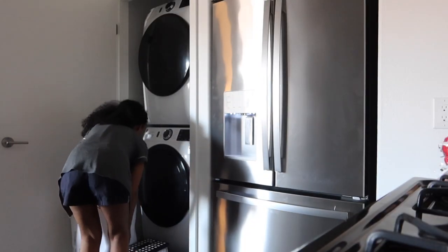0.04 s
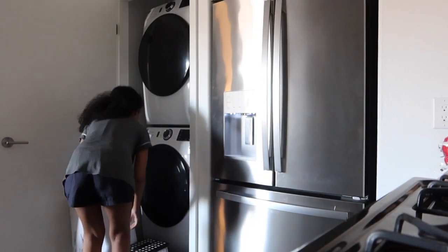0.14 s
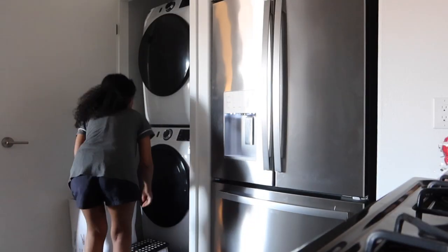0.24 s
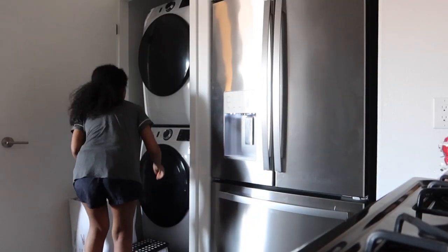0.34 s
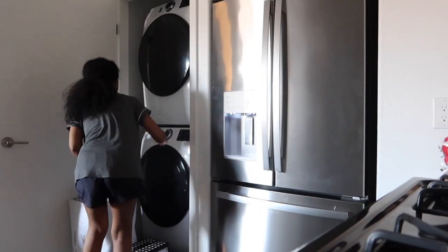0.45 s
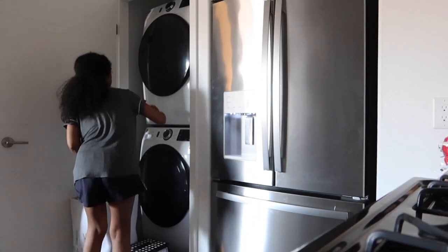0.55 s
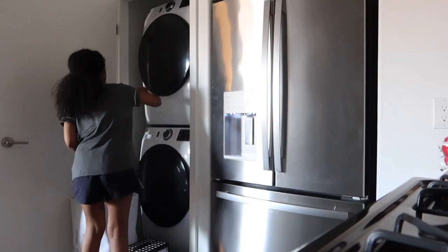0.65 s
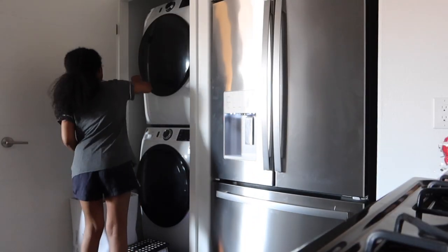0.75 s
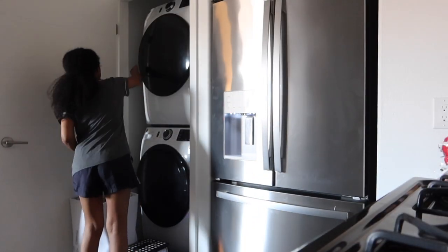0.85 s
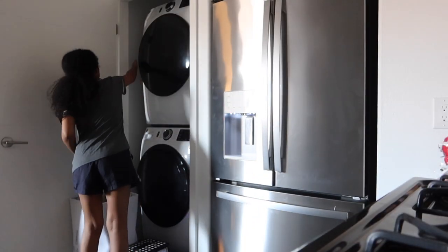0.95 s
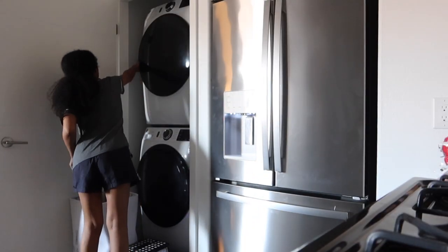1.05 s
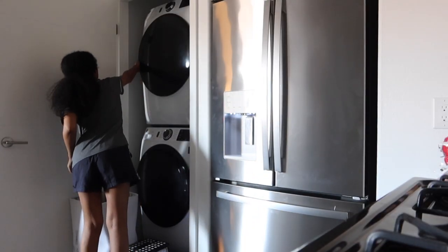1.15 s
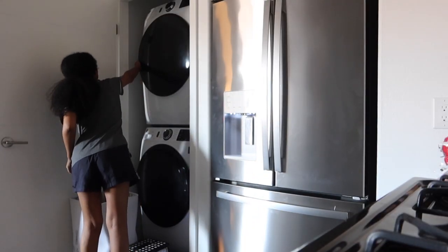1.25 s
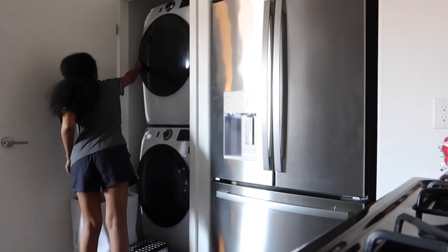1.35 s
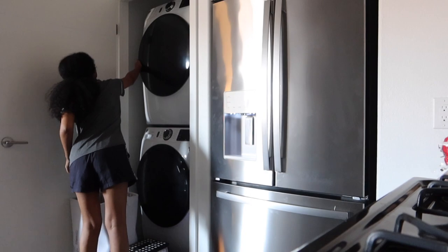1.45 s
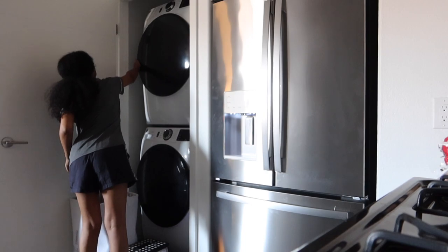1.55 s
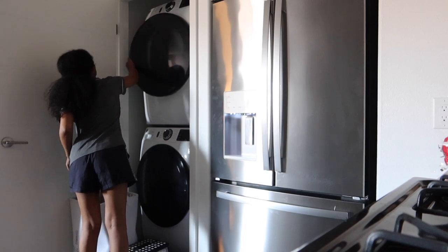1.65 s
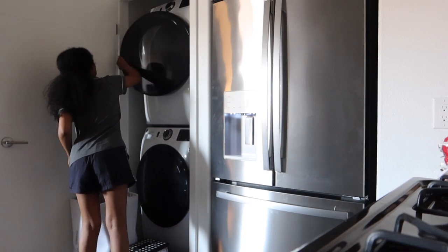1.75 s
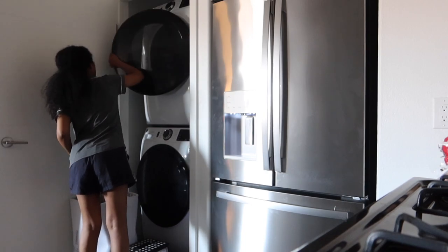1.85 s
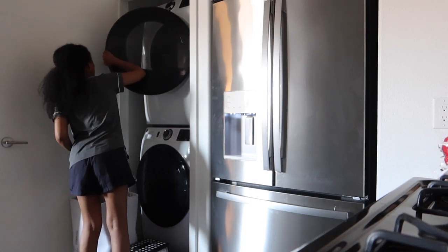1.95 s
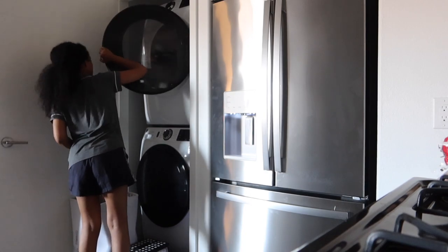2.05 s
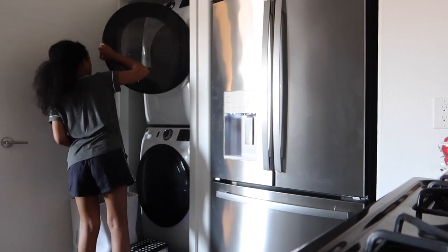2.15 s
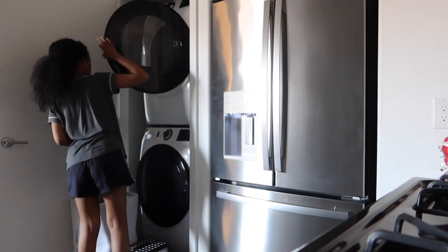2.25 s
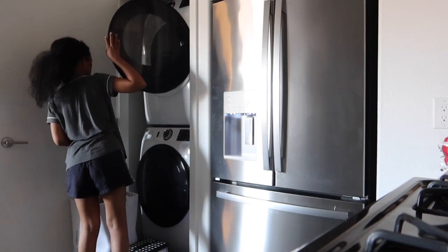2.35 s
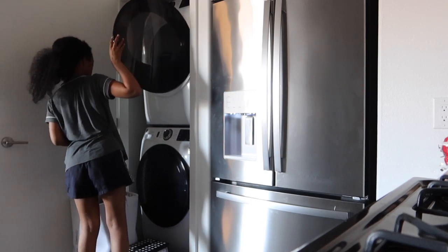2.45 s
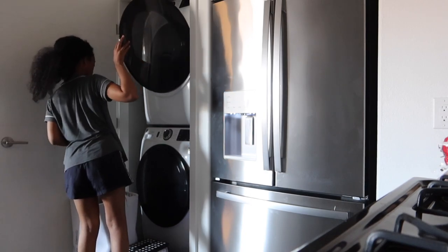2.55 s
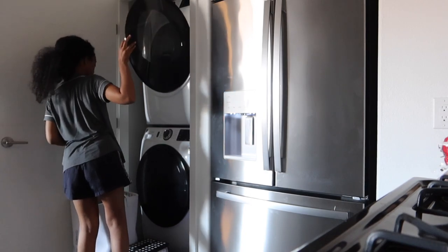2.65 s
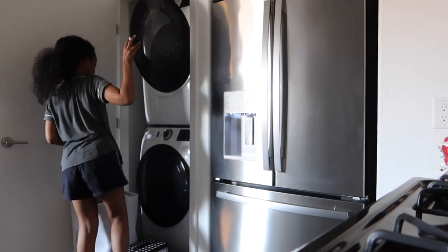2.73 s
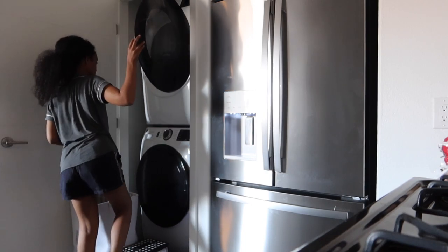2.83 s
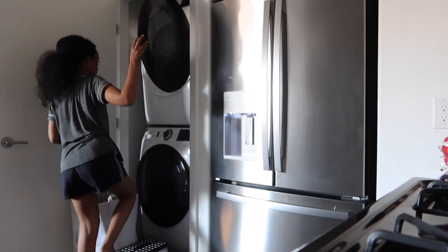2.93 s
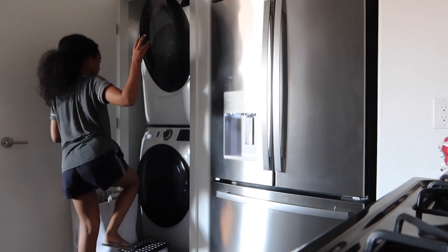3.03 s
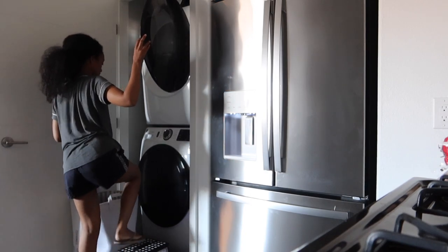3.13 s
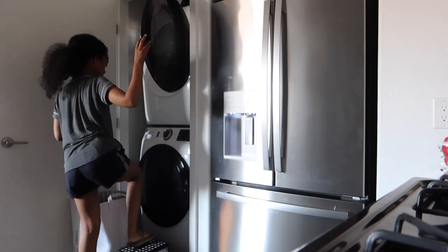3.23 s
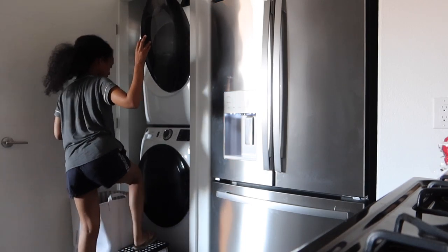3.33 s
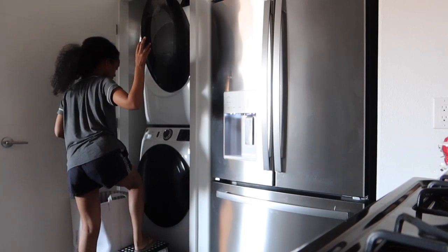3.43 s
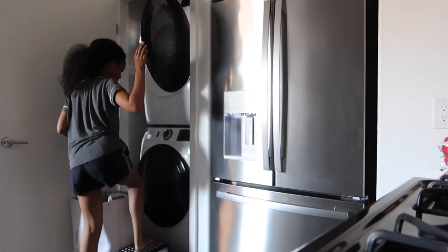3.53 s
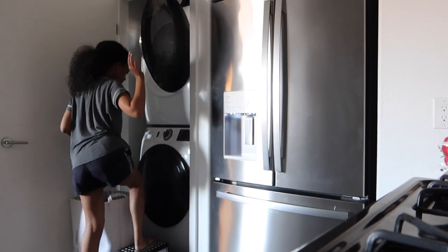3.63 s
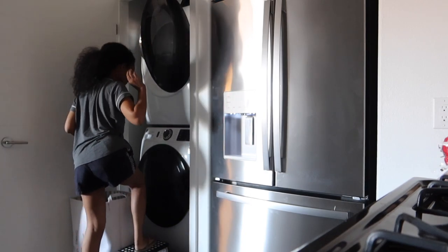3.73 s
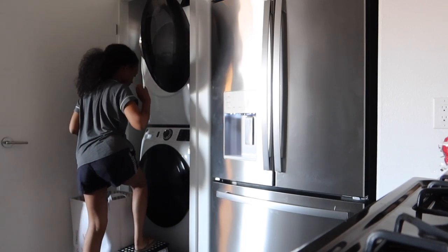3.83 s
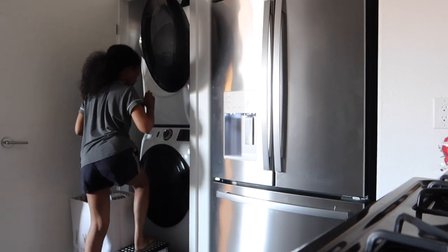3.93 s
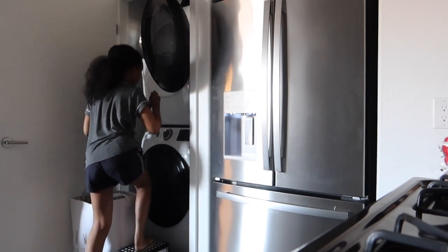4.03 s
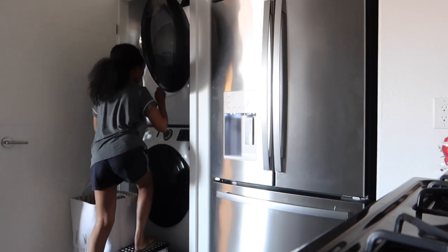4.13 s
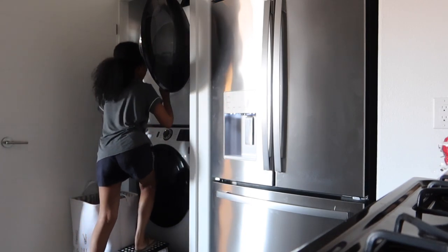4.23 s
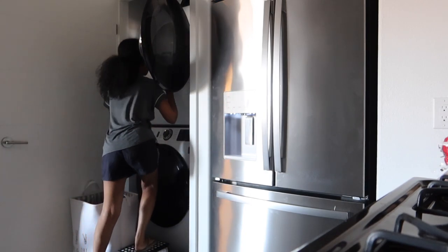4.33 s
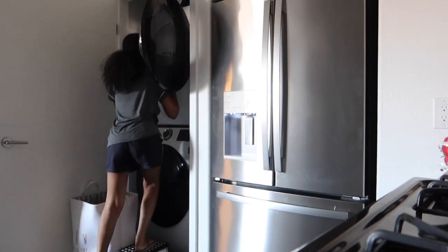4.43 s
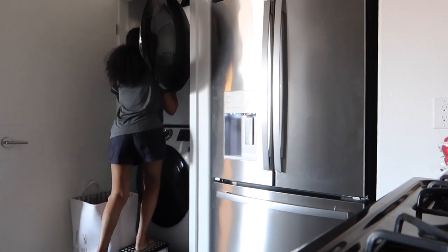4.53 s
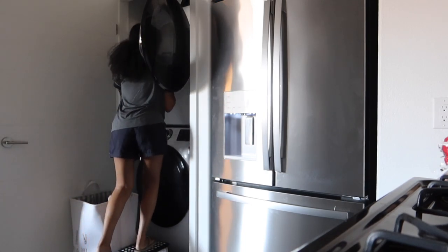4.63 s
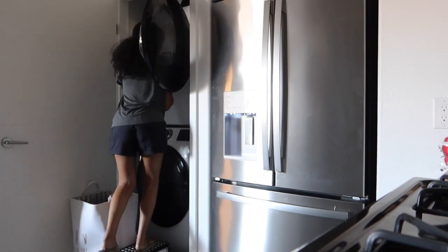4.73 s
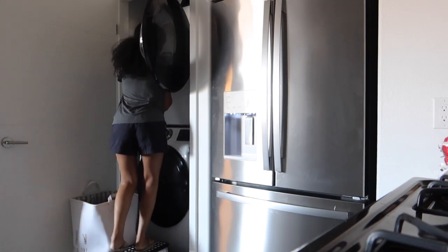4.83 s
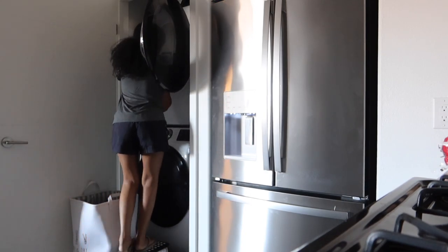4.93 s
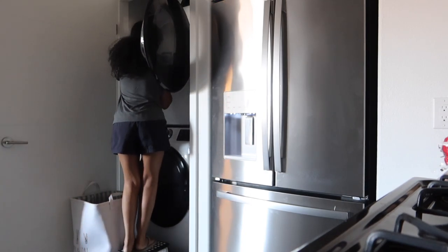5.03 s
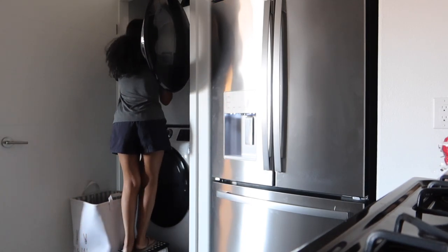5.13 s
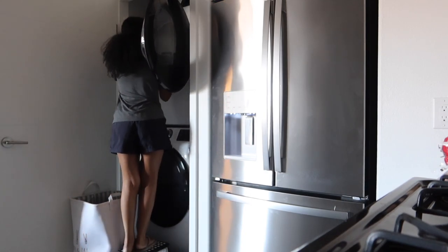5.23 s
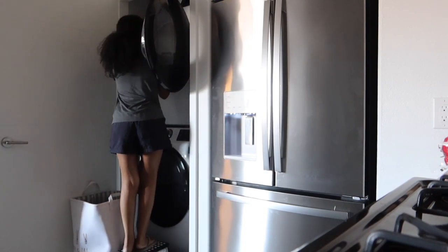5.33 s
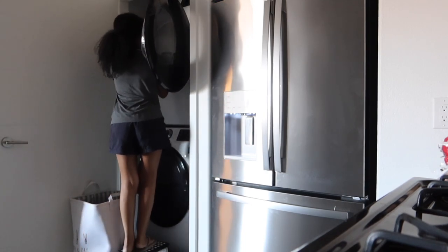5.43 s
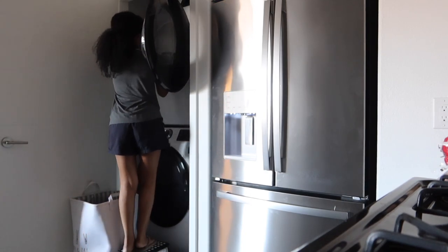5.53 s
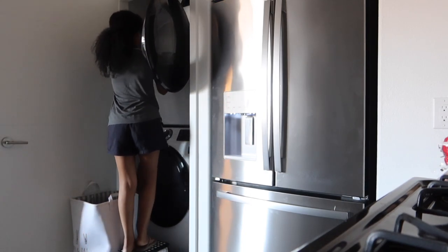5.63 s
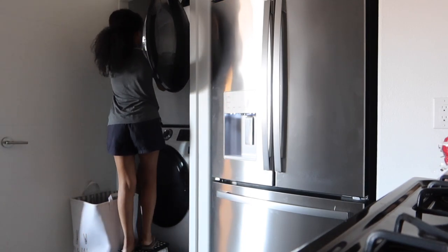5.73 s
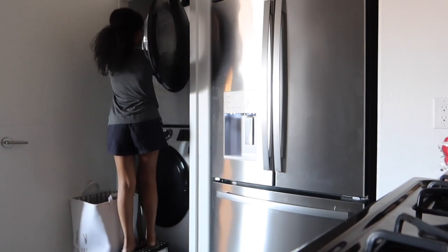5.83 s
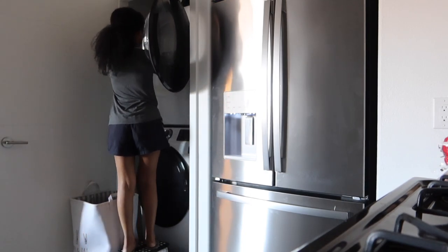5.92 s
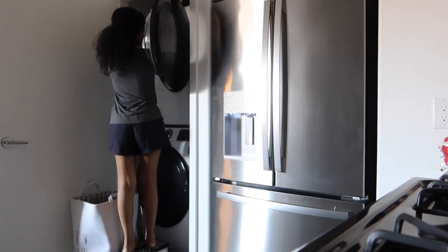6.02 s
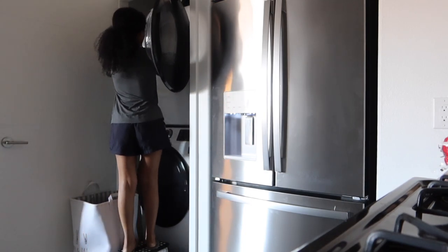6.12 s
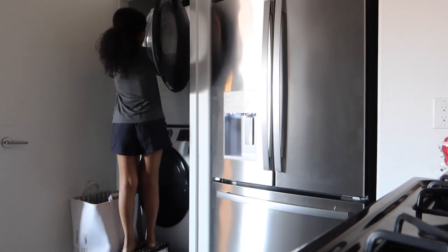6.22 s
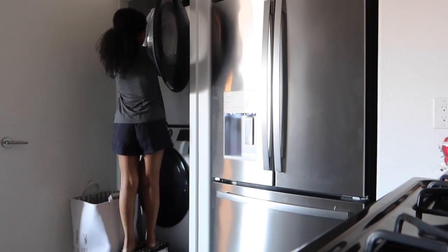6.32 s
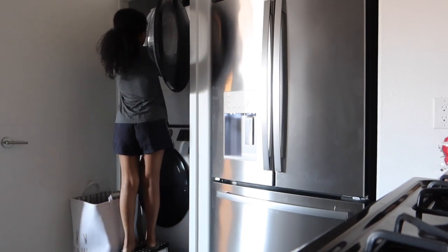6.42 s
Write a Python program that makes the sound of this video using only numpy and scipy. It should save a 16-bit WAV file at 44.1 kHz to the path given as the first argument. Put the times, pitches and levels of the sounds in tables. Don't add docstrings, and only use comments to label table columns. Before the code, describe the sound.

A bare, echoing home with steady low duct rumble, faint hiss and a fridge hum near 93 hertz that swells and fades irregularly. From 0 to 0.3 s cloth rustles and fades; at 0.45-0.65 s a washer door thumps shut, hollow and low, with a latch click and small rebounds, then a light tick at 0.8 s. Fabric rises until a small clack at 1.15 s. From 1.4 s the dryer door strains in quick knocks, popping loudly at 1.6 s with plastic and sheet-metal rattle, trailing taps until 1.95 s. Soft rubbing follows from 2.3 to 3.3 s. At 3.46 s a step stool scrapes and thuds, landing with a hard, ringing clack at 3.66 s. Light foot touches from 4.4 s lead to heavier knocks at 5.0-5.1 s. Cloth rustles faintly, with tiny ticks at 5.7 and 5.9 s, then echo and hum.

```python
import sys
import numpy as np
from scipy import signal
from scipy.io import wavfile
from scipy.ndimage import uniform_filter1d

SR = 44100
rng = np.random.default_rng(int(sys.argv[2]) if len(sys.argv) > 2 else 0)


def invert_db(level):
    return 10 ** (np.asarray(level, dtype=float) / 20)


def to_wav(sig):
    pcm = np.clip(np.atleast_2d(sig), -1, 1) * 32767
    pcm = np.round(pcm).astype(np.int16)
    wavfile.write(sys.argv[1], SR, pcm.T)


N = 285439

# f/Hz, level/dB
NOOK = [(200, -1.5), (800, -5.5), (2500, -1), (5000, -4), (8000, 0.5), (12000, 6)]
# f/Hz, side minus mid/dB
ROOM_SIDE = [(60, -53), (110, -46.5), (200, -35.5), (380, -25), (700, -29), (1290, -24.5), (2380, -25.5),
             (4400, -5), (8120, -1), (15000, 4)]


def unit(x):
    return x / np.sqrt(np.sum(x ** 2) + 1e-30)


def read(points, hz):
    f, value = np.transpose(points)
    return np.interp(np.log(hz + 1), np.log(f + 1), value)


def colour(x, points):
    hz = abs(np.fft.fftfreq(4096, 1 / SR))
    log_gain = np.log(invert_db(np.maximum(read(points, hz), -100)))
    taps = np.fft.ifft(np.exp(np.conj(signal.hilbert(log_gain)))).real[:2048]
    taps = taps[None] * np.ones(x.shape[:-1] + (1,))
    return signal.oaconvolve(x, taps, axes=-1)[..., :x.shape[-1]]


def hiss(points, patchy_db, size=2048):
    # f/Hz, side minus mid/dB
    noise_side = [(60, -33), (110, -25.5), (200, -10), (380, -13), (700, -10.5), (1290, -8.5), (2380, -6.5),
                  (4400, -4), (8120, -4), (15000, -2)]
    hz = np.fft.rfftfreq(size, 1 / SR)
    a, b, c, d, patches = rng.standard_normal((4 * N // size + 5, len(hz), 5)).T
    patches = uniform_filter1d(patches, size // 80, 0)
    patches = uniform_filter1d(patches, 16384 // size, 1)
    side_gain = invert_db(read(noise_side, hz))[:, None]
    spectra = np.array([a + 1j * b, (c + 1j * d) * side_gain])
    spectra *= invert_db(read(points, hz)[:, None] + patchy_db * patches / patches.std())
    x = signal.istft(spectra, nperseg=size, noverlap=3 * size // 4)[1][:, :N]
    return x / x[0].std()


def ducts():
    # f/Hz, level/dB per Hz
    duct_colour = [(15, -42), (27, -11), (59, -15.5), (96, -5), (193, -12.5), (227, -20), (281, -13),
                   (440, -11.5), (520, -23), (871, -22.5), (1080, -27.5), (1530, -31.5), (3340, -38),
                   (15500, -61)]
    return invert_db(-40) * hiss(duct_colour, patchy_db=1.5, size=4096)


def fridge_hum():
    # t/s, level/dB
    swell = [(0.0, -61), (0.35, -36), (0.7, -55), (0.95, -42), (1.4, -43), (1.95, -53), (2.2, -38.5),
             (2.7, -38), (3.05, -64), (3.7, -44), (4.3, -48), (4.7, -40.5), (5.05, -37.5), (5.35, -56),
             (5.6, -39.5), (5.9, -63), (6.2, -37), (6.47, -51)]
    pitch_hz, waver_hz, throb_db, waver_s = 92.6, 4.02, 1.5, 0.0615
    span = round(waver_s * SR)
    drift = uniform_filter1d(rng.standard_normal((2, N)), span)
    waver, throb = uniform_filter1d(drift, span)
    hz = pitch_hz + waver_hz * waver / waver.std()
    db = np.interp(np.arange(N) / SR, *np.transpose(swell)) + throb_db * throb / throb.std()
    hum = np.sqrt(2) * invert_db(db - 5.0) * np.sin(2 * np.pi * np.cumsum(hz) / SR)
    return hum * [[1], [0]]


def cloth():
    # t/s, length/s, level at start/dB, level at end/dB
    rustles = [
        (0.0, 0.33, -46, -60),
        (0.708, 0.43, -61, -47),
        (2.294, .45, -54.5, -56),
        (2.737, 0.54, -51, -54.5),
        (4.098, 0.94, -55.5, -64),
        (5.4, 1.5, -55, -59),
    ]
    # f/Hz, level/dB per Hz
    cloth_colour = [(200, -39), (600, 18.5), (1500, 10), (3000, 0), (6000, -8.5), (12000, -22),
                    (15500, -35)]
    level = np.zeros(N)
    for s, length, from_db, to_db in rustles:
        part = level[round(s * SR):round((s + length) * SR)]
        part += invert_db(np.linspace(from_db, to_db, len(part))) * signal.windows.tukey(len(part), 0.15)
    return level * hiss(cloth_colour, patchy_db=2.2, size=512)


def strikes(source, blows):
    answers = {"washer": (-0.8, 0.2, -10.5, -22.5, 1.18), "dryer": (0.5, .1, -17.5, -27.5, 1.06),
               "drags": (1, 0.4, -20.5, -31, 1.04), "steps": (3.1, 0.44, -12, -24.5, 1.07)}
    nearness = {"washer": -4, "dryer": 0.7, "drags": -2, "steps": 3.5}
    panel_db, share, latch_db, tick_db, pitch = answers[source]
    for s, force, heft, snap in blows:
        panel = force + panel_db + share * heft
        latch, tick = force + latch_db + snap, force + tick_db + snap
        yield s, nearness[source], pitch, force, force + heft, panel, latch, tick


def washer_door():
    # t/s, force/dB, heft/dB, snap/dB
    shut = [
        (0.3084, -48, -14, 5),
        (0.4651, -41.5, 15, 0),
        (0.4768, -38, 8, -14),
        (0.487, -30.5, -2, 1.5),
        (0.498, -35, 4, 2),
        (0.5139, -30.5, -16, 2),
        (0.5991, -40, -13, -2),
        (0.6491, -42, 0, 6),
        (0.7953, -42.5, -5, 2),
    ]
    return strikes("washer", shut)


def dryer_door():
    # t/s, force/dB, heft/dB, snap/dB
    pull = [(1.155, -32, -9, 2), (1.4169, -38, 5, 4), (1.4466, -35.5, -4, -6), (1.474, -31.5, 3, 0),
            (1.4988, -26.5, -6, 3.5), (1.5277, -27.5, 3, -1), (1.5656, -19.5, -24, 0.5),
            (1.5968, -18.5, -2.5, 6), (1.6055, -13.5, -12.5, 0.5), (1.6267, -23, 6.5, -5),
            (1.6497, -18.5, -6.5, 4.5), (1.7174, -32, 0.5, -9), (1.8638, -32, 3, -2), (1.9315, -34, -4, 0),
            (2.7588, -46.5, -8, -6)]
    return strikes("dryer", pull)


def stool_drags():
    # t/s, force/dB, heft/dB, snap/dB
    drags = [
        (3.458, -28.5, -2, -2),
        (3.4764, -31, 6.5, 6.5),
        (3.5214, -46, 10, -2),
        (3.657, -23.5, -15.5, 0),
        (3.6895, -32, 0, -7),
        (3.712, -32.5, -4, -10),
    ]
    return strikes("drags", drags)


def stool_steps():
    # t/s, force/dB, heft/dB, snap/dB
    feet = [
        (4.4248, -40, -24, 1),
        (4.521, -47, -7, -2),
        (4.7673, -41.5, -3, -14),
        (4.9092, -50.5, 15, 2),
        (5.011, -36, 12, -2),
        (5.0299, -35, -23, 2),
        (5.0707, -28.5, -13, -1),
        (5.7144, -49, -14, 5),
        (5.889, -51.5, 1, 8),
    ]
    return strikes("steps", feet)


def blow(pitch, shell_db, drum_db, panel_db, latch_db, tick_db):
    # f/Hz, level/dB per Hz
    shell = [(900, -9), (1500, 7), (2000, 3.5), (2800, -1), (3500, -8), (4200, -19.5), (8000, -54)]
    drum = [(120, -5), (220, -3.5), (340, 0.5), (470, -8), (700, -3), (1500, -76.5)]
    panels = [(350, -62), (600, 8.5), (850, 5.5), (1300, 6.5), (1900, -18), (4000, -46)]
    latch = [(2200, -26.5), (3200, -8), (4300, -1.5), (6000, -6.5), (7500, -17), (11000, -36)]
    tick = [(5000, -20), (7500, 5.5), (9500, 0), (11500, -5), (13000, -7), (14200, -16), (15500, -22)]
    rattle_s, rattle_share = 0.004, 0.56
    t = np.arange(4096) / SR
    grains = (rng.random(4096) < 0.15) * rng.standard_normal(4096)
    spray = unit(grains * t * np.exp(-2 * t / rattle_s))
    push = np.arange(4096) == 30
    impacts = np.array([spray, unit(push + rattle_share * spray)])
    hz = np.linspace(0, SR / 2, 513)
    levels = (shell_db, drum_db, panel_db, latch_db, tick_db)
    parts = (np.multiply(shell, [pitch, 1]), drum, panels, latch, tick)
    power = 0
    for db, part in zip(levels, parts):
        power = power + (invert_db(db + 50) * unit(invert_db(read(part, hz)))) ** 2
    blow_gain = invert_db(-0.5)
    return blow_gain * colour(impacts, np.transpose([hz, 10 * np.log10(power)]))


def mode(hz, width_hz, t):
    return np.sin(2 * np.pi * hz * t) * np.exp(-np.pi * width_hz * t)


def echoes():
    # f/Hz, t60/s
    room_t60 = [(60, 1.3), (150, 0.91), (400, 0.91), (1000, 1.14), (2200, 0.94), (4000, 0.97), (6500, 0.73),
                (10000, 0.59), (14000, 0.6)]
    build_s, nook_s, nook_rise_s = 0.0031, 0.035, 0.00086
    taps = np.zeros((4, 60000))
    at = np.arange(40, 59960, 10) + rng.integers(0, 10, (4, 5992))
    np.put_along_axis(taps, at, rng.standard_normal(at.shape), 1)
    s = np.arange(60000) / SR
    hz, t, z = signal.stft(taps[:2] * (1 - np.exp(-s / build_s)), SR, nperseg=512)
    decay = invert_db(-60 * t / read(room_t60, hz)[:, None])
    room = signal.istft(z * decay, SR, nperseg=512)[1][:, :60000]
    nook_shape = np.exp(-s / nook_s) * (1 - np.exp(-s / nook_rise_s))
    nook = colour(unit(taps[2:] * nook_shape), NOOK)
    mid, side = np.sqrt(2) * (unit(room) + nook)
    return np.array([mid, colour(side[None], ROOM_SIDE)[0]])


def doors_and_stool():
    # t/s, f/Hz, width/Hz, level/dB, rise/s
    rings = [(.466, 347.6, 14, -25.5, .0031), (.472, 50, 17, -29, .003), (.49, 910, 26, -30.5, 0.0039),
             (.51, 326, 27, -26, 0.0034), (.5, 102.1, 7.4, -18, 0.037), (1.153, 11400, 450, -39, .00087),
             (1.605, 45, 19, -24, .0061), (1.606, 843, 51, -11, 0.0019), (1.606, 1200, 46, -21, .001),
             (1.65, 150.5, 6.8, -19.5, 0.017), (3.48, 299, 19, -27, 0.002), (3.515, 136.5, 22, -23, 0.0045),
             (3.54, 76, 11, -27.5, .0071), (3.659, 2370, 72, -20, .002), (3.664, 11100, 300, -39, .001),
             (3.666, 1208, 28, -22, .0027), (5.011, 96.4, 12, -24, .0082), (5.012, 368, 14, -25.5, 0.0023),
             (5.014, 1200, 94, -22, .0041), (5.074, 863, 53, -21, 0.0024), (5.075, 1150, 58, -27, 0.002),
             (5.075, 368, 31, -27, 0.0011)]
    lead_s, direct_db, ring_echo_db = 0.002, -9, -5.5
    spots = np.zeros((3, 2, N + SR))
    blows = [*washer_door(), *dryer_door(), *stool_drags(), *stool_steps()]
    for k, (s, near_db, *levels) in enumerate(blows):
        near = invert_db([[near_db], [0]])
        start = round((s - lead_s) * SR)
        spots[k % 3, :, start:][:, :4096] += near * blow(*levels)
    close = invert_db(direct_db) * colour(spots[:, 0].sum(0)[None], NOOK)[0]
    t = np.arange(SR // 2) / SR
    for k, (s, hz, width_hz, db, rise_s) in enumerate(rings):
        ring = invert_db(db) * mode(hz, width_hz, t) * (1 - np.exp(-t / rise_s))
        start = round(s * SR)
        close[start:][:len(t)] += ring
        spots[k % 3, 1, start:][:len(t)] += invert_db(ring_echo_db) * ring
    difference = np.roll(close, 3)[None, :N] - np.roll(close, -3)[None, :N]
    side = colour(difference, ROOM_SIDE)[0]
    wet = sum(signal.fftconvolve(spot[1:, :N], echoes(), axes=1)[:, :N] for spot in spots)
    return wet + [close[:N], 0.36 * side]


def scene():
    mid, side = ducts() + fridge_hum() + cloth() + doors_and_stool()
    return np.array([mid + side, mid - side])


def low_pass(x):
    return signal.sosfilt(signal.butter(12, 15660, fs=SR, output="sos"), x)


def record(dry):
    edge = signal.firwin(255, 15550, window=("kaiser", 8), fs=SR)
    mix = signal.oaconvolve(dry, edge[None], "same")
    return low_pass(mix)


dry = scene()
out = record(dry)
to_wav(out)
```